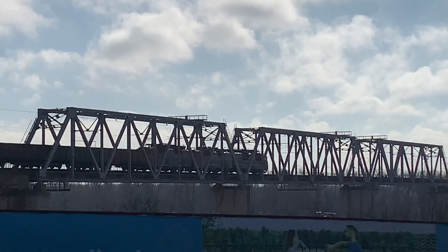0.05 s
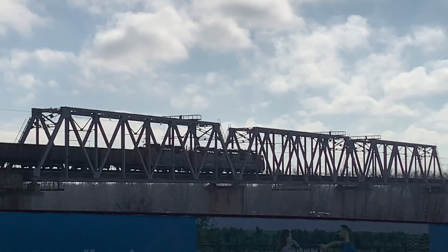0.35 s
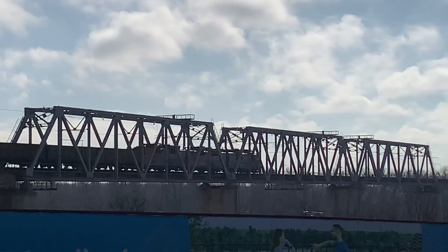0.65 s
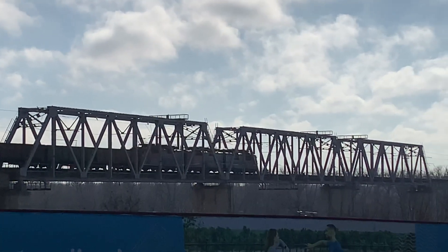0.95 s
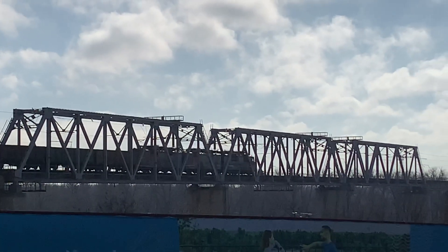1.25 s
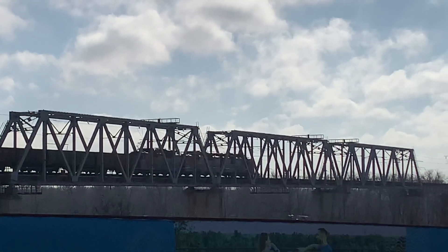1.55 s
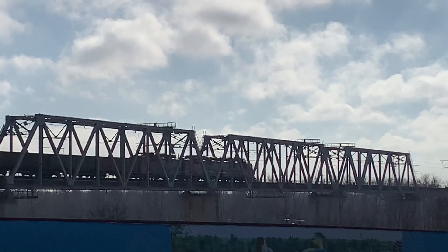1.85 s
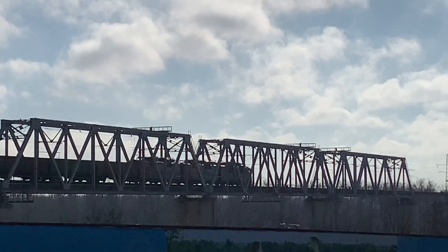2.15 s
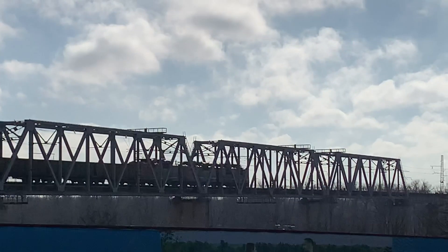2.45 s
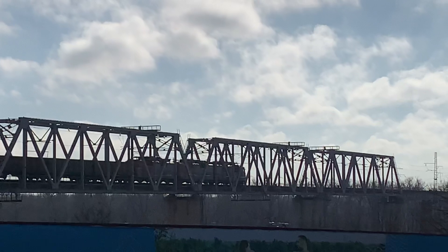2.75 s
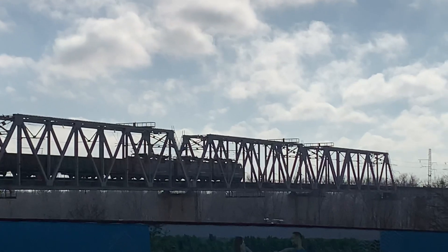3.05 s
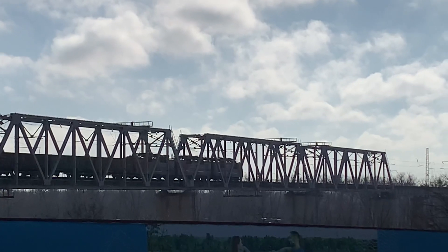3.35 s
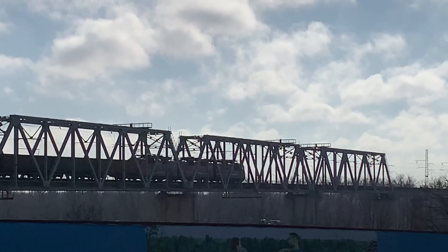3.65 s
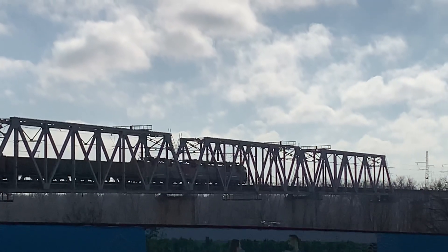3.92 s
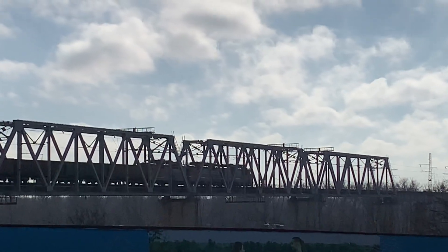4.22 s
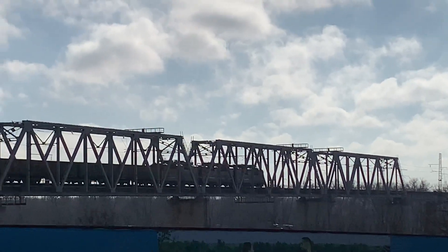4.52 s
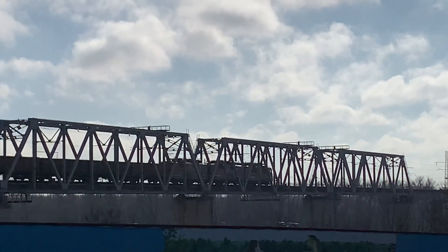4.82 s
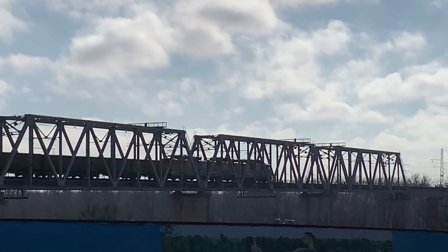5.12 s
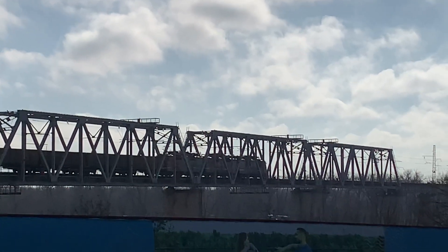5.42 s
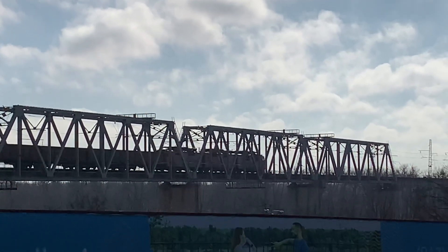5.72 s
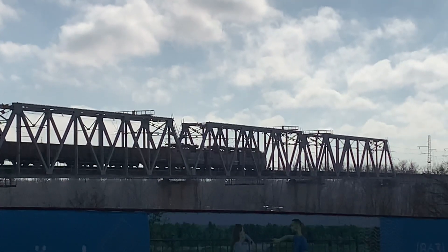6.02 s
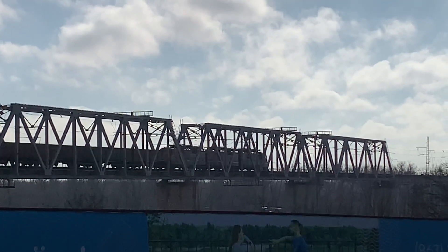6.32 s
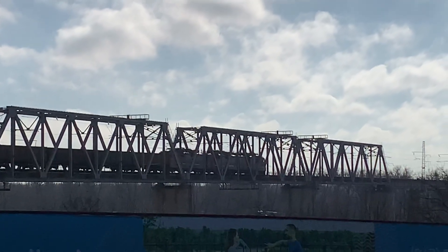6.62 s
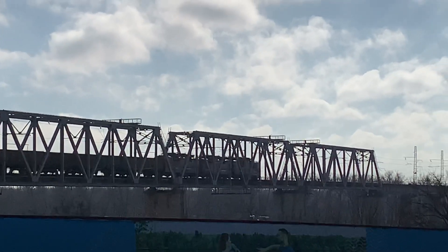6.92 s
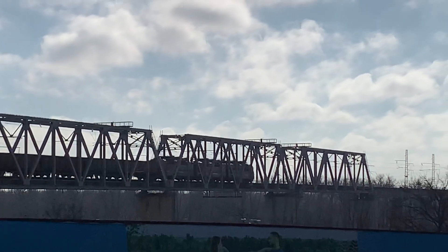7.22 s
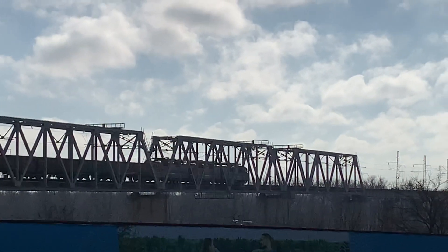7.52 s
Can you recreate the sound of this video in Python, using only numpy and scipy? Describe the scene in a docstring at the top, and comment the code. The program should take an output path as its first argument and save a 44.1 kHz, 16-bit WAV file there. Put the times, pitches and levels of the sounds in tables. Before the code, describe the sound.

Some way off to the left, freight wagons roll over a steel bridge with a deep, continuous rumble and a roar that surges a little under twice a second. Hollow wheel knocks, metal clanks, light clinks and brief beam groans run through it. Thin squeaks come and go, growing into ringing wheel scrapes in the second half. Shortly before the last scrapes, soft low bumps sound near the microphone.

```python
"""Freight train on a steel bridge

Some way off to the left, a train rolls over a truss bridge: girders boom and crossbeams groan.
Wagons rattle, wheels knock over rail joints, couplings clank and loose fittings clink.
The roar surges about every 0.6 s as a pair of bogies (the wheeled frames under the wagons) arrives.
Steel squeaks, wheel rims rub the rail (mostly later on), and near the end dull thuds sound close by."""
import sys
import numpy as np
from scipy import signal
from scipy.fft import rfft, irfft, next_fast_len
from scipy.io import wavfile
from scipy.ndimage import uniform_filter1d, map_coordinates

SR = 44100
rng = np.random.default_rng(int(sys.argv[2]) if len(sys.argv) > 2 else 0)


def wav_out(sig):
    """Save sig, one row per channel (or a flat mono array), as 16-bit PCM at SR to the path in sys.argv[1]."""
    wavfile.write(sys.argv[1], SR, np.round(np.clip(np.atleast_2d(sig).T, -1, 1) * 32767).astype(np.int16))


N = 338247

# a pair of bogies runs onto the bridge:
# t/s, roar level/dB, hiss level/dB, second bogie compared with the first/dB, rise time/s
BOGIE_PAIRS = [(0.019, -46.5, -52.5, -5.5, 0.034), (0.629, -45, -58, -3, 0.009),
               (1.21, -49.5, -55.5, -5, 0.026), (1.83, -46.5, -54, 1.5, 0.019),
               (2.469, -41.5, -54, -2, 0.018), (3.117, -42.5, -55.5, -6.5, 0.016),
               (3.71, -44, -53.5, 2, 0.046), (4.32, -38.5, -52, -6.5, 0.067), (4.92, -51.5, -53.5, 1, .02),
               (5.56, -44, -50.5, -2.5, 0.017), (6.13, -50, -53.5, -17.5, 0.048),
               (6.83, -48.5, -55.5, 4, 0.047), (7.47, -43.5, -63, -2, 0.014)]
# the train's sound between surges: t/s, roar level/dB, hiss level/dB, rattle level/dB
TRAIN_LEVELS = [(0, -44, -60, -36), (1.3, -44, -55, -33.5), (2.15, -41, -59.5, -33), (2.4, -45, -58.5, -36),
                (2.7, -50, -63, -34.5), (3.0, -45, -60.5, -35), (3.65, -45, -62.5, -33.5),
                (4.2, -42.5, -51, -35), (4.85, -42.5, -60.5, -34), (6.1, -45, -61.5, -35),
                (6.7, -43, -55, -32.5), (7.25, -43.5, -47.5, -41.5), (7.66, -45.5, -53.5, -40)]
FLUTTER_DB = 2  # how unsteady the rubbing of steel on steel is


def amp(db):
    """Turn decibels into a gain to multiply by."""
    return 10 ** (np.asarray(db) / 20)


def unit(x):
    """Scale a signal to an average (rms) level of 1."""
    return x / np.sqrt(np.mean(x ** 2) + 1e-20)


def along(points, hz):
    """Read between (f/Hz, value) points, with octaves evenly spaced."""
    f, values = np.transpose(points)
    return np.interp(np.log(hz + 1), np.log(f), values)


def curves(rows):
    """One value per sample for each column after the time."""
    times, *columns = np.transpose(rows)
    return [np.interp(np.arange(N) / SR, times, column) for column in columns]


def noise(count=N):
    """Two unrelated white noises."""
    return rng.standard_normal((2, count))


def wobble(rate, count=N):
    """A smooth random curve through `rate` points a second."""
    points = rng.standard_normal(int(count * rate / SR) + 4)
    return map_coordinates(points, [np.arange(count) * rate / SR])


def add(track, s, sound):
    """Mix a sound into a track at s seconds."""
    part = track[..., max(round(s * SR), 0):][..., :sound.shape[-1]]
    part += sound[..., :part.shape[-1]]


def shape(points):
    """A tone colour (gain at each frequency) from (f/Hz, level/dB) points."""
    return lambda hz: amp(along(points, hz))


def resonance(hz, width_hz):
    """A tone colour with one peak; the gain halves width_hz to either side."""
    return lambda f: 1 / (1 + ((f - hz) / width_hz) ** 2)


def at_mics(pair, colour):
    """Turn two unrelated noises into coloured stereo of level 1 that reaches the left side first."""
    # how alike left and right are: f/Hz, likeness (0 to 1)
    likeness = [(60, 0.88), (250, 0.92), (480, 0.95), (800, 0.12), (1200, 0.25), (1700, 0.6), (2100, 0.77),
                (2500, 0.31), (3200, 0.23), (6500, 0.24)]
    # how much earlier the left side hears the sound: f/Hz, lead/s
    left_lead = [(60, 0.000088), (450, 0.00029), (1600, 0.00033), (2400, 0.00038), (6000, 0.000475)]
    count = pair.shape[1]
    padded = next_fast_len(count + 8192)
    hz = np.fft.rfftfreq(padded, 1 / SR)
    spread = np.arccos(np.clip(along(likeness, hz), 0, 1)) / 2
    mid, side = rfft(pair, padded) * colour(hz) * [np.cos(spread), np.sin(spread)]
    shift = np.exp(1j * np.pi * hz * along(left_lead, hz))
    left_right = np.array([(mid + side) * shift, (mid - side) / shift])
    return unit(irfft(left_right, padded)[:, :count])


def patchy(depth_db, size):
    """Two noises whose narrow bands swell and fade, as many steel parts ring in turn."""
    bands = signal.stft(noise(), nperseg=2048)[2]
    patch = np.outer(np.hanning(size[0]), np.hanning(size[1]))  # bands by time steps
    swells = signal.fftconvolve(rng.standard_normal(bands.shape[1:]), patch, 'same')
    return signal.istft(bands * amp(depth_db * np.clip(unit(swells), -2, 2)), nperseg=2048)[1][:, :N]


def jolts(rate, spread_db, t60):
    """Loudness curve of small random blows, `rate` a second, each fading 60 dB in t60 seconds."""
    blows = (rng.random(N) < rate / SR) * amp(spread_db * np.clip(rng.standard_normal(N), -2, 2))
    t = np.arange(SR // 2) / SR
    power = signal.fftconvolve(blows ** 2, amp(-60 * t / t60) ** 2)[:N]
    return unit(np.sqrt(np.abs(power)))


def ring(hz, t60, attack, t):
    """One fading note with a soft start and a peak of 1."""
    wave = np.sin(2 * np.pi * hz * t) * amp(-60 * t / t60) * (1 - np.exp(-t / attack))
    return wave / np.abs(wave).max()


def surges(levels_db):
    """Sound power of the passing bogies: each swells, holds and dies away."""
    hold_s, fade_s, bogie_gap_s = 0.11, 0.98, 0.2
    power, t = np.zeros(N), np.arange(SR) / SR
    release = amp(-60 * (np.maximum(t, hold_s) - hold_s) / fade_s)
    for (s, _, _, second_db, attack), db in zip(BOGIE_PAIRS, levels_db):
        surge = (1 - np.exp(-t / attack)) * release
        add(power, s, (amp(db) * surge) ** 2)
        add(power, s + bogie_gap_s, (amp(db + second_db) * surge) ** 2)
    return power


def load():
    """Weight of the passing bogies on the bridge, 0 to 1."""
    return np.minimum(np.sqrt(surges(np.zeros(len(BOGIE_PAIRS)))), 1)


def clinks():
    """Loose fittings ring briefly at random pitches; high ones are softer, and all dip under a bogie."""
    per_second, low_hz, high_hz = 30, 1340, 3950
    lowest_note_db, octave_db, bogie_db = -50, -5.5, -1
    out, t, weight = np.zeros((2, N)), np.arange(SR // 8) / SR, load()
    fade = amp(-60 * t / .15) * (1 - np.exp(-t / 0.0017))
    for when, pitch in rng.random((round(per_second * N / SR), 2)):
        hz = low_hz * (high_hz / low_hz) ** pitch
        db = lowest_note_db + octave_db * np.log2(hz / low_hz) + bogie_db * weight[int(when * N)]
        note = at_mics(noise(len(t)), resonance(hz, width_hz=65))
        add(out, when * N / SR, amp(db) * fade * note)
    return out


def squeaks():
    """Rubbing briefly makes steel sing one wavering note, which echoes among the bridge's beams."""
    # steel squeaking on steel: t/s, length/s, f/Hz, level/dB
    squeals = [(0.392, .09, 4160, -61.5), (1.215, 0.095, 4190, -59), (2.267, 0.11, 5350, -64),
               (2.56, 0.18, 5580, -66), (3.97, .13, 5550, -64), (4.06, .27, 4440, -62.5),
               (4.33, .3, 4420, -64.5), (4.7, .27, 4410, -69.5), (5.61, .12, 6370, -65),
               (7.05, 0.11, 3580, -52), (7.09, .19, 6380, -64.5), (7.15, .12, 5460, -58),
               (7.19, .14, 4490, -58)]
    pitch_waver, tone_to_echo = .0045, .55
    out = np.zeros((2, N))
    for s, length, hz, db in squeals:
        count = round(length * SR)
        swell = np.hanning(count) ** 0.77
        pitch = hz * (1 + pitch_waver * wobble(160, count))
        tone = np.sqrt(2) * np.sin(2 * np.pi * np.cumsum(pitch) / SR)
        echoes = at_mics(noise(count), resonance(hz, width_hz=18))
        level = amp(db + FLUTTER_DB * wobble(28, count))
        add(out, s, level * swell * unit(tone_to_echo * tone + echoes))
    return out


def flanges():
    """A wheel's guiding rim (flange) presses on the rail, sticks and slips so it rings, then lets go."""
    # the notes each of four wheels rings at: f/Hz, width/Hz, level/dB
    wheel_0 = [(1010, 30, -3), (1600, 440, -4), (2370, 130, 2.5), (2614, 50, 6), (2850, 70, 2),
               (3455, 45, 1), (3760, 59, -3), (4470, 99, -5.5), (5030, 24, -3.5)]
    wheel_1 = [(1580, 80, 6.5), (2045, 88, 2), (2590, 160, -3), (2900, 440, -9), (3640, 70, -1.5),
               (4070, 110, -10), (4610, 87, -4.5), (5390, 36, -7.5), (7200, 230, -16), (9950, 210, -27.5)]
    wheel_2 = [(1950, 65, 1), (2500, 170, -1), (2800, 60, -6.5), (3760, 40, -5), (4000, 82, -7),
               (4450, 90, -10), (5580, 68, -10), (6780, 500, -21), (10100, 200, -33.5)]
    wheel_3 = [(3780, 90, 0), (4010, 190, -1)]
    # each rub at its hardest: t/s, level/dB, rise/(dB per s), fall/(dB per s), wheel (0 to 3)
    rubs = [(4.43, -44, 42, 36, 0), (4.66, -57.5, 100, 50, 0), (7.13, -43.3, 50, 48, 1),
            (7.487, -41.3, 500, 68, 2), (2.28, -59, 50, 70, 3), (5.66, -58, 18, 10, 3),
            (7.06, -52, 30, 45, 3)]
    steady_grind = 1.1
    out, t = np.zeros((2, N)), np.arange(N) / SR
    for wheel, notes in enumerate([wheel_0, wheel_1, wheel_2, wheel_3]):
        def colour(f):
            return np.sqrt(sum((amp(db) * resonance(hz, width)(f)) ** 2 for hz, width, db in notes))
        contact = sum(amp(db - np.maximum(rise * (s - t), fall * (t - s)))
                      for s, db, rise, fall, which in rubs if round(which) == wheel)
        scrape = patchy(depth_db=2.2, size=(4, 6)) * (steady_grind + jolts(rate=90, spread_db=2, t60=.07))
        out += contact * amp(FLUTTER_DB * wobble(22)) * at_mics(scrape, colour)
    return out


def thuds():
    """Short, dull bumps close by, the same on both sides."""
    # each bump: t/s, relative level/dB, f/Hz
    bumps = [(6.52, -5.5, 77.2), (6.746, -9.5, 121), (6.765, -5, 106.5), (6.79, -20.5, 410),
             (6.798, -12, 292), (6.81, -5.5, 117.5), (6.823, -11, 160), (6.828, -22, 364),
             (6.848, -9, 101.4), (6.902, -11.5, 273), (6.909, -4, 111), (6.911, -19, 432),
             (6.969, -3.5, 73.7)]
    lowest_hz = 25
    out, t = np.zeros(N), np.arange(SR // 5) / SR
    for s, db, hz in bumps:
        add(out, s, amp(db - 4) * ring(hz, t60=0.04, attack=0.0018, t=t))
    return signal.sosfilt(signal.butter(2, lowest_hz, 'highpass', fs=SR, output='sos'), out)


def crossbeams():
    """A jolted crossbeam groans briefly on two notes at once."""
    # passing axles jolt a beam: t/s, relative level/dB, f/Hz
    groans = [(0.954, -23.5, 193), (1.168, -24.5, 194), (1.944, -22, 174), (2.592, -22, 205.4),
              (3.422, -25.5, 186), (3.916, -27, 217), (4.615, -26, 220), (5.516, -21.5, 195.4),
              (6.141, -26, 211)]
    out, t = np.zeros(N), np.arange(SR // 3) / SR
    for s, db, hz in groans:
        lower = ring(hz, t60=.12, attack=0.031, t=t)
        upper = ring(hz * 1.5, t60=0.12, attack=.012, t=t)
        add(out, s, amp(db - 6) * (lower + amp(-5) * upper))
    return out


def girders():
    """The bridge's main beams boom steadily under the load, and harder under the heaviest axles."""
    # tone colour of the girders: f/Hz, level/dB
    boom_colour = [(15, -56.5), (25, -28), (33, -14), (48, 7.5), (58, 9.5), (66, 18), (76, 11), (95, 11.5),
                   (120, 3), (170, -6.5), (300, -79)]
    # heavy axles drop onto the bridge deck: t/s, peak level/dB, f/Hz
    axle_drops = [(1.3, -17.5, 75.6), (2.189, -18.5, 72.6), (3.902, -15, 71.5), (4.411, -16, 61.3),
                  (5.191, -19.5, 63.5), (5.32, -21.5, 72), (5.568, -16.5, 64.2), (5.699, -16, 82),
                  (5.851, -18, 91), (6.612, -18, 84.3), (6.801, -13, 77.3), (7.177, -15.5, 70.3)]
    steady_db, bogie_db = -25.5, 1
    boom = at_mics(noise(), shape(boom_colour))
    power = np.abs(uniform_filter1d(np.mean(boom ** 2, axis=0), size=3500)) + 1e-4
    evened = unit(boom / power ** 0.093)  # so many axles share the bridge that its swells stay shallow
    out = evened * amp(steady_db + bogie_db * load())
    t = np.arange(SR // 2) / SR
    for s, db, hz in axle_drops:
        add(out, s, amp(db) * ring(hz, t60=0.12, attack=0.056, t=t))
    return out


def couplings():
    """Steel hits steel and bounces: a clash with one ringing note, drawn out by the bridge's beams."""
    # couplings and brake gear: t/s, relative level/dB, note f/Hz, note level/dB, tilt/(dB per octave)
    clanks = [(.27, -36, 2063, 1.5, 4), (.672, -32.5, 3340, -4.5, 2), (1.045, -33.5, 1660, -4.5, 2.5),
              (1.362, -27, 1640, -5.5, -1.5), (1.43, -32, 1930, -2.5, 2.4), (1.837, -26, 1120, -13, -1),
              (1.859, -36, 1710, 6, 4), (2.499, -39, 2520, -3, -1.5), (2.734, -26.5, 4000, -18, -2.5),
              (3.132, -30, 1110, -6, -2), (3.449, -31.5, 1010, 0, -2), (4.668, -28.5, 960, -2, -1),
              (4.932, -35, 3480, -6, 2.5), (5.327, -35, 1600, -6.5, 1.5), (5.621, -32.5, 1530, -2, -0.5),
              (5.826, -35, 3330, -7, -0.5), (6.227, -30.5, 1310, -5.5, 0), (7.483, -36, 2450, -5.5, 4),
              (7.535, -35, 1040, 0, 3)]
    # tone colour of a clash before its tilt: f/Hz, level/dB
    clash_colour = [(300, 7), (700, 12), (1100, 11), (1700, 1), (2600, 1), (4000, -6.5), (6500, -24.5),
                    (9000, -48)]
    bounce_s, bounce_db = .022, -9.5
    out, t = np.zeros((2, N)), np.arange(SR // 2) / SR
    rise = 1 - np.exp(-t / .002)
    decay = amp(-60 * t / 0.16) + amp(-12.5 - 60 * t / .5)  # a quick fade and a quieter, longer tail
    for s, db, note_hz, note_db, tilt_db in clanks:
        note_fade = amp(note_db + 2 - 60 * t / 0.22)
        for delay, loss_db in [(0, 0), (bounce_s, bounce_db)]:
            clash = at_mics(noise(len(t)), lambda f: amp(along(clash_colour, f) + tilt_db * np.log2(f + 1)))
            note = at_mics(noise(len(t)), resonance(note_hz, width_hz=32))
            add(out, s + delay, amp(db + loss_db - 8.5) * rise * (decay * clash + note_fade * note))
    return out


def rail_joints():
    """A wheel drops into a rail gap: a hollow knock, a shudder of the deck and an echo off a girder."""
    # wheels strike the joints: t/s, relative level/dB, f/Hz
    strikes = [(0.064, -21.5, 418), (.226, -30.5, 339), (.553, -28, 418), (0.829, -25.5, 474),
               (1.232, -23, 410), (1.54, -30, 433), (2.033, -28.5, 330), (2.733, -23.5, 354),
               (4.316, -22, 405), (5.288, -27.5, 266), (5.624, -26, 302), (5.827, -24, 397),
               (6.231, -24, 386)]
    deck_colour = [(120, -21.5), (300, -2), (500, 2.0), (720, -20), (1500, -69.5)]  # f/Hz, level/dB
    out, t = np.zeros((2, N)), np.arange(SR // 3) / SR
    shudder_fade = amp(-4.5 - 60 * t / 0.15) * (1 - np.exp(-t / 0.00094))
    for s, db, hz in strikes:
        knock = ring(hz, t60=.03, attack=.012, t=t) * (1 - np.exp(-t / .0015))
        shudder = shudder_fade * at_mics(noise(len(t)), shape(deck_colour))
        add(out, s - .003, amp(db) * (knock + shudder))
        add(out, s + 0.01064, amp(db - 8.5) * knock)  # the echo
    return out


def wagons():
    """Wagon bodies rattle under a stream of small jolts, louder as each bogie arrives."""
    # tone colour of the wagon bodies: f/Hz, level/dB
    body_colour = [(70, -26), (130, 0), (200, 0.5), (280, -4), (340, -6.5), (410, -7.5), (520, -11.5),
                   (680, -27.5), (1100, -81.5)]
    bogie_db = 3
    _, _, rattle_db = curves(TRAIN_LEVELS)
    shaking = noise() * (1.8 + jolts(rate=110, spread_db=2, t60=.07))
    return amp(rattle_db + bogie_db * load()) * at_mics(shaking, shape(body_colour))


def rolling():
    """Rough wheels make the rails roar and hiss, with loose fittings faintly chattering along."""
    # tone colour of the roar as heard: f/Hz, level/dB
    roar_colour = [(300, -13), (600, 3), (780, -1), (980, 1.5), (1300, -2), (1600, -1.5), (2000, -7),
                   (2600, -11), (3200, -12.5), (4200, -20.5), (6000, -85.5)]
    # tone colour of the hiss as heard, with a gap near 8.6 kHz: f/Hz, level/dB
    hiss_colour = [(1200, -5), (2500, 15), (3200, 6), (4100, 6.5), (5000, 4.5), (5700, 1), (6800, -4),
                   (7600, -13), (8600, -39), (11000, -16), (15000, -43.5)]
    roar_db, hiss_db, _ = curves(TRAIN_LEVELS)
    _, surge_roar_db, surge_hiss_db, _, _ = np.transpose(BOGIE_PAIRS)
    chatter = 1.8 + jolts(rate=70, spread_db=2.5, t60=.14)
    roar = at_mics(patchy(depth_db=1.8, size=(6, 8)) * chatter, shape(roar_colour))
    hiss = at_mics(patchy(depth_db=2.8, size=(6, 10)), shape(hiss_colour))
    roar_gain = np.sqrt(amp(roar_db) ** 2 + surges(surge_roar_db))
    hiss_gain = np.sqrt(amp(hiss_db) ** 2 + surges(surge_hiss_db))
    return roar_gain * roar + hiss_gain * hiss


def scene():
    """Add up the small sounds, the bridge and the train."""
    small_sounds = clinks() + squeaks() + flanges() + thuds()
    bridge = crossbeams() + girders()
    train = couplings() + rail_joints() + wagons() + rolling()
    return small_sounds + bridge + train


def record(dry):
    """Balance left against right and cut the treble above 12.2 kHz."""
    # how much louder the left is than the right: f/Hz, level/dB
    balance = [(40, -1), (120, 0), (280, 0.5), (600, 1.5), (1000, 3.0), (1500, 0.6), (2500, 1.0),
               (3300, 2.5), (5000, -3.0), (8000, -0.5)]
    top_hz = 12200
    padded = next_fast_len(N + 8192)
    hz = np.fft.rfftfreq(padded, 1 / SR)
    left_db = along(balance, hz)
    gains = amp([left_db / 2, -left_db / 2]) * (hz < top_hz)
    return irfft(rfft(dry, padded) * gains, padded)[:, :N]


dry = scene()
out = record(dry)
wav_out(out)
```